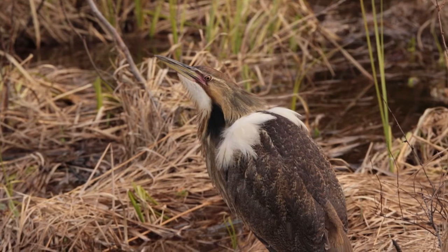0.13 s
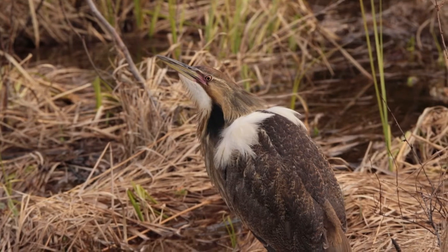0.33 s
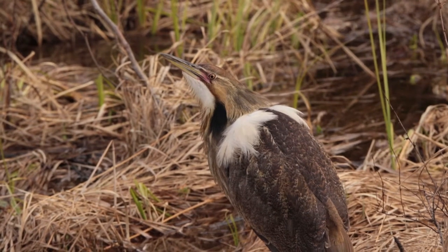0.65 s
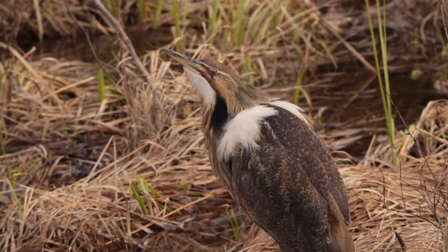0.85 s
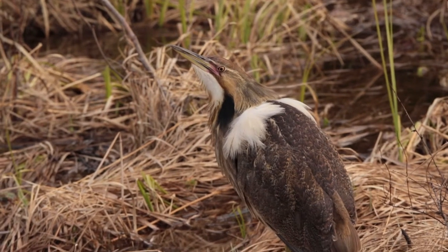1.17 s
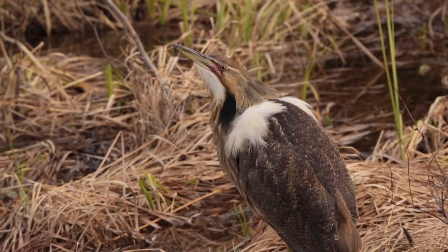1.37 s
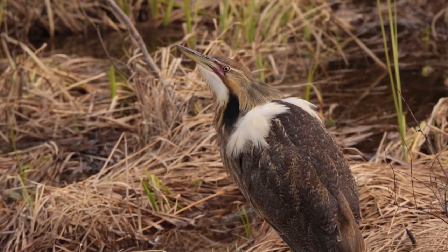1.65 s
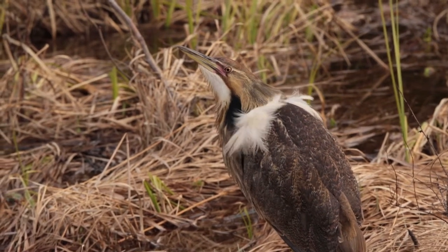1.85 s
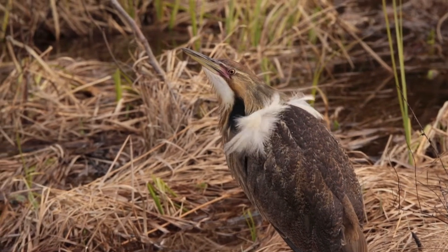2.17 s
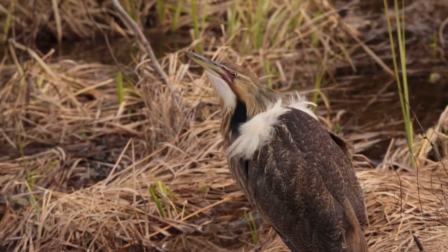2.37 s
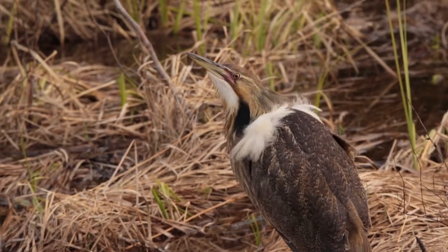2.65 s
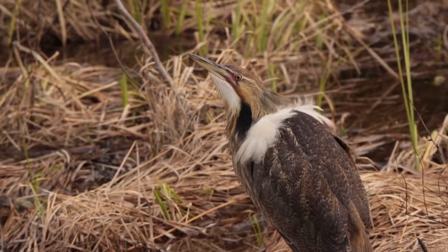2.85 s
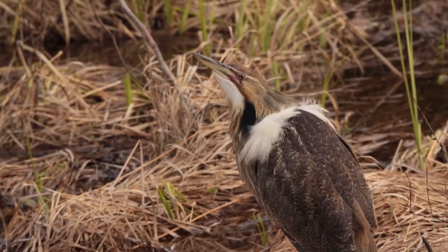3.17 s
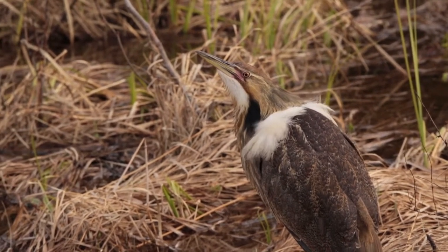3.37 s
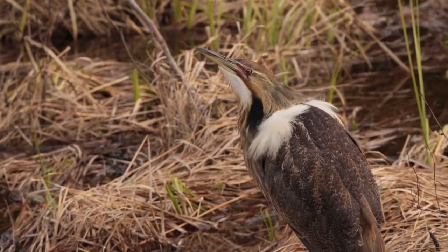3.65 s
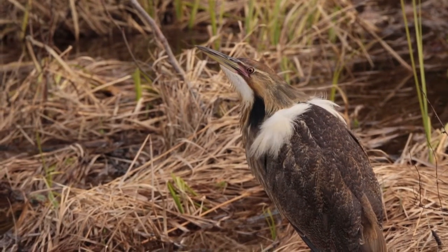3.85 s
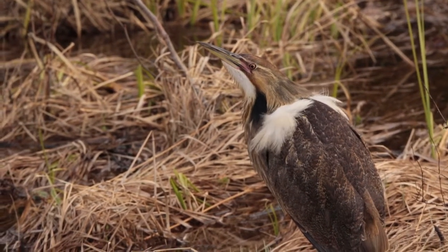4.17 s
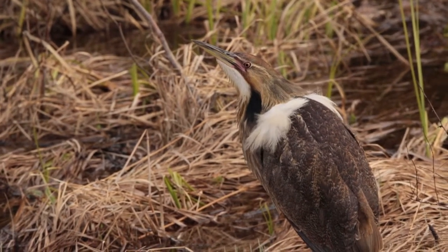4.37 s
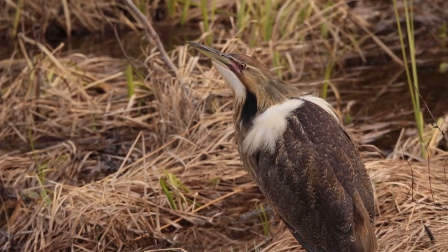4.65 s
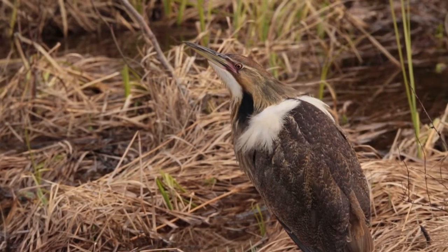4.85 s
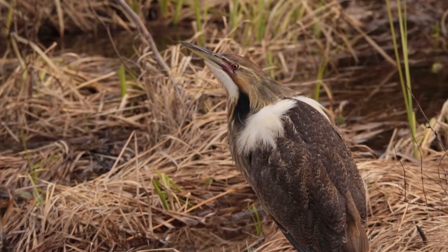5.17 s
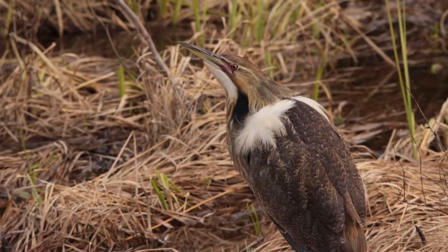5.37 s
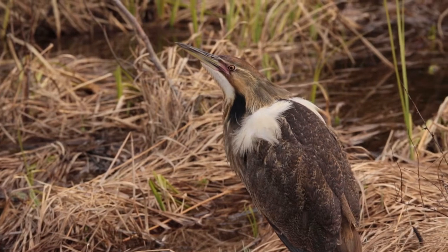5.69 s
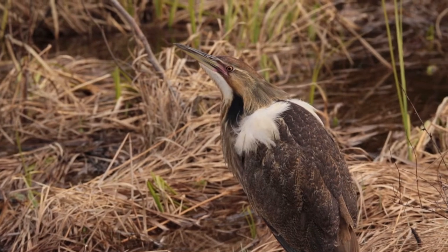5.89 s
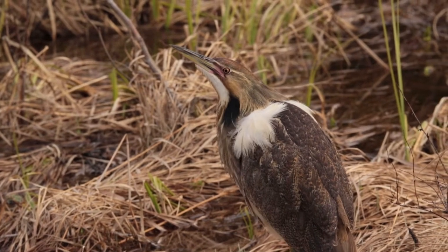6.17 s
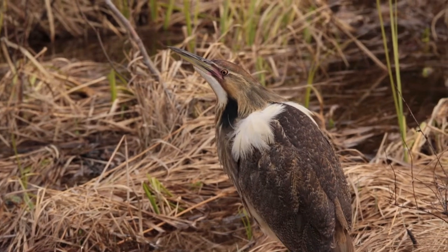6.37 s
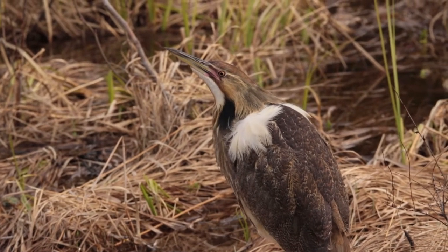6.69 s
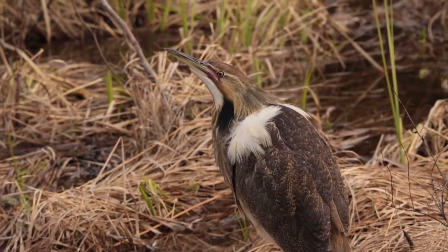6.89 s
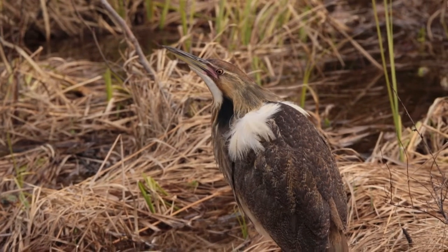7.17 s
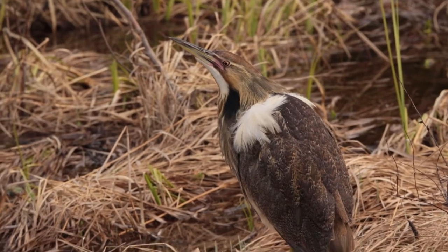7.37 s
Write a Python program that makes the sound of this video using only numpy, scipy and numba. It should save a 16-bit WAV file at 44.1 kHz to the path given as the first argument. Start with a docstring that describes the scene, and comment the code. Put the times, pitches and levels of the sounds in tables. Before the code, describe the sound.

Outdoor marsh: low wind buffeting at the start, steady far frog chorus, six sharp close frog peeps, faint hum and two light knocks.

```python
"""First one hears a gust of wind rumble on a microphone: noise through low-pass filters that follow the wind.
Behind it far tree frogs merge into a high chorus of overlapping sine glides, over faint distant air.
Soon one close frog peeps about once a second: multiples of a gliding fold rate, weighted by its vocal sac.
Later the tripod mount hums low and is knocked twice, as two damped modes driven by noise and by impulses.
One microphone feeds both channels; each adds its own amplifier hiss, a separate shaped noise."""
import sys
import numpy as np
from scipy import signal
from scipy.fft import rfft, irfft
from scipy.io import wavfile
from scipy.ndimage import uniform_filter1d
from numba import njit

SR = 44100
rng = np.random.default_rng(int(sys.argv[2]) if len(sys.argv) > 2 else 0)


def nominal_scale(level):
    """Amplitude ratio for a level in decibels (scalar or array-like)."""
    x = np.asarray(level, float) / 20
    return 10 ** x


def inscribe(sig):
    """Save sig as 16-bit PCM at rate SR to the path in sys.argv[1].

    A 1-D sig is mono; a 2-D sig holds one channel per row.
    Samples are clipped to [-1, 1] before scaling.
    """
    pcm = np.round(np.clip(np.atleast_2d(sig).T, -1, 1) * 32767)
    wavfile.write(sys.argv[1], SR, pcm.astype(np.int16))


N = 332236  # samples
T = np.arange(N) / SR  # s


def level(x, db):
    """Root-mean-square scaling: sets the rms of the whole signal."""
    return x * nominal_scale(db) / np.sqrt(np.mean(x ** 2))


def curve(rows, calm_db):
    """Linear interpolation of a (t/s, level/dB) table, calm outside it."""
    t, db = np.transpose(rows)
    return np.interp(T, t, db, calm_db, calm_db)


def colour(points, hz):
    """Spectral envelope: level in dB, interpolated along log frequency."""
    f, db = np.transpose(points)
    return np.interp(np.log(np.maximum(hz, 1)), np.log(f), db)


def noise(points, channels):
    """Spectral shaping: white noise weighted by an envelope in the frequency domain."""
    white = rfft(rng.standard_normal((channels, N)))
    hz = np.arange(N // 2 + 1) * SR / N
    return irfft(white * nominal_scale(colour(points, hz)), N)


def walk(rate, size=N):
    """Slow random modulation: levels held 1 / rate s, smoothed twice, standard deviation 1."""
    hold = max(int(SR / rate), 1)
    steps = np.repeat(rng.standard_normal(size // hold + 2), hold)
    smooth = uniform_filter1d(uniform_filter1d(steps, hold), hold)[:size]
    return smooth / smooth.std()


@njit
def low_pass(x, hz, damp):
    """State-variable filter: a resonator's low-pass output, its corner moving every sample."""
    y, band, low = np.empty(len(x)), 0., 0.
    for i in range(len(x)):
        g = np.tan(np.pi * hz[i] / SR)
        v = (band + g * (x[i] - low)) / (1 + g * (g + damp))
        y[i] = low + g * v
        band, low = 2 * v - band, 2 * y[i] - low
    return y


# wind on the microphone before puffs and flurries, one table a gust: (t/s, level/dB)
GUSTS = [
    [(0, -48), (.24, -47.5), (.42, -39.5), (.8, -42.5), (1.6, -43.5), (1.72, -47), (2.05, -43.5),
     (2.26, -51), (2.56, -50.5), (2.83, -60), (3.1, -76)],
    [(3.69, -81), (3.72, -66), (3.82, -69), (3.99, -69), (4.08, -74), (4.2, -69), (4.23, -81)],
    [(5.24, -74), (5.29, -65.5), (5.45, -71), (5.65, -62), (6.04, -58), (6.33, -50), (6.45, -49.5),
     (6.63, -52), (6.8, -48.5), (7.1, -52.5), (7.33, -58.5), (7.53, -55.5)],
]
# brief puffs (+) and lulls (-) inside the gusts: (t/s, level change/dB)
PUFFS = [(0.411, 3.5), (.53, 4.5), (0.871, 6), (1.07, 4), (1.16, 3.5), (1.37, 4.5), (1.5, 3), (1.61, 8),
         (1.84, 3.5), (2.05, 1.5), (2.31, 3.5), (5.6, 6), (6.33, 0), (6.89, -11), (7.03, 3.5), (7.17, 4)]
CALM_DB = -86  # between gusts
PUFF_S, FLURRY_DB = 0.023, 0.85  # half width of a puff; quick random flicker of the wind
# eddy corner at -42 dB; its rise in dB of frequency (20 log10) per dB of wind; microphone low cut
EDDY_HZ, EDDY_SLOPE, LOW_CUT_HZ = 126.5, 0.22, 57.4


def wind():
    """Turbulence: eddies tumble past the capsule; a faster gust is louder and its eddies reach higher."""
    db = np.max([curve(rows, CALM_DB) for rows in GUSTS], axis=0)
    db = uniform_filter1d(db, size=SR // 60)
    pace_db = uniform_filter1d(db, size=SR // 6) + 42
    corner_hz = EDDY_HZ * nominal_scale(EDDY_SLOPE * pace_db + 0.82 * walk(14))
    eddies = low_pass(rng.standard_normal(N), corner_hz, 0.94)
    rumble = low_pass(eddies, 1.93 * corner_hz, 2.4)
    low_cut = signal.butter(2, LOW_CUT_HZ, "high", fs=SR, output="sos")
    rumble = signal.sosfilt(low_cut, rumble)
    # even out the running power, so that the level comes from the tables
    steady = rumble / np.sqrt(uniform_filter1d(rumble ** 2, size=SR // 8) + 1e-12)
    puffs_db = sum(change_db * np.exp(-((T - t) / PUFF_S) ** 2) for t, change_db in PUFFS)
    return steady * nominal_scale(db + puffs_db + FLURRY_DB * walk(14))


FAR_COUNT, FAR_S = 2218, .13  # peeps over the scene and the half second before it; length of each
FAR_HZ, FAR_SPREAD_HZ, FAR_SCATTER_DB = 2686, 125, 2  # mean pitch; standard deviations of pitch and level
FAR_RISE = 0.1298  # rise within a peep, as a share of its pitch
MARSH_T60_S, MARSH_WET_DB = 1, 2.5  # decay time; reverberant energy over direct
CHORUS_DB, CHORUS_SWELL_DB = -67, 0.73  # level before the swell; spread of the slow swell


def far_frogs():
    """Superposition and reverberation: hundreds of rising peeps a second overlap, and the marsh smears them."""
    chance = rng.standard_normal((FAR_COUNT, 2))
    starts = (rng.random(FAR_COUNT) * (N + SR // 2)).astype(int)
    size = int(FAR_S * SR)
    u = np.arange(size) / size
    glide = np.cumsum(1 + FAR_RISE * (np.sin(np.pi * .58 * u) - .65))
    envelope = np.sin(np.pi * u)
    direct = np.zeros(N + SR)
    for i, (pitch, loudness) in zip(starts, chance):
        hz = FAR_HZ + FAR_SPREAD_HZ * pitch
        tone = np.sin(2 * np.pi * hz * glide / SR)
        direct[i:i + size] += nominal_scale(FAR_SCATTER_DB * loudness) * tone * envelope
    t = np.arange(SR // 2) / SR
    decay = rng.standard_normal(len(t)) * 1000 ** (-t / MARSH_T60_S)
    tail = level(decay, MARSH_WET_DB) / np.sqrt(len(t))
    chorus = direct + signal.fftconvolve(direct, tail)[:len(direct)]
    chorus = level(chorus[SR // 2:SR // 2 + N], 0)
    return chorus * nominal_scale(CHORUS_DB + CHORUS_SWELL_DB * walk(2.99))


# spectrum of the distant air: (f/Hz, relative level/dB per Hz)
AIR_SPECTRUM = [(20, -4.5), (60, 2.5), (140, -1), (220, -3), (500, -5.5), (900, -9.5), (1800, -24),
                (4000, -30)]


def distant_air():
    """Stationary broadband noise: one shaped noise at the capsule, alike in both channels."""
    return level(noise(AIR_SPECTRUM, channels=1)[0], -73.5)


# spectrum of the amplifier hiss: (f/Hz, relative level/dB per Hz)
HISS_SPECTRUM = [(20, -1.5), (300, -1.5), (2000, -4.5), (4000, -6.5), (13000, -8.5), (16000, -8)]


def amplifier_hiss():
    """Uncorrelated noise: each channel's amplifier hisses independently of the other."""
    return level(noise(HISS_SPECTRUM, channels=2), -65)


# effort swells twice while held: (share of the held time, level relative to the peep's effort/dB)
EFFORT = [(.2, 0), (.45, -3), (.7, 1), (.88, -3.5), (1, -8.5)]
START_DB, OPENING_DB = -2.5, -2  # relative to the peep's effort, before and after the scoop
TAIL_DB, TAIL_FADE_DB = -60.5, -5  # effort once slack, and its change by the end
# end of a scoop of no length; a longer scoop starts lower and lands higher
OPENING_HZ, SCOOP_HZ_PER_S, OVERSHOOT_HZ_PER_S = 1201, 12100, 7000
TOP_FROM, TOP_TO, HOOK_HZ = .72, .9, 52  # shares of the held time at the top rate, then a droop
COLLAPSE_S, COLLAPSED_HZ = .011, 1045
LINGER_S, LINGER_HZ_PER_S, TAIL_S, SAG_HZ_PER_S = .02, 2500, .024, 8500  # both rates fall


def peep(scoop, held, top_hz, db):
    """Fold tension sets the rate: scoop, climb, top, droop, collapse; slack, it lingers and sags away."""
    slack_s = held + COLLAPSE_S
    linger_end_s = slack_s + LINGER_S
    end_s = linger_end_s + TAIL_S
    t = np.arange(int(end_s * SR)) / SR
    opening_hz = OPENING_HZ + OVERSHOOT_HZ_PER_S * scoop
    start_hz = opening_hz - SCOOP_HZ_PER_S * scoop
    sag_hz = COLLAPSED_HZ - LINGER_HZ_PER_S * LINGER_S
    end_hz = sag_hz - SAG_HZ_PER_S * TAIL_S
    hz = np.interp(t, [0, scoop, TOP_FROM * held, TOP_TO * held, held, slack_s, linger_end_s, end_s],
                   [start_hz, opening_hz, top_hz, top_hz, top_hz - HOOK_HZ, COLLAPSED_HZ, sag_hz, end_hz])
    share, relative_db = np.transpose(EFFORT)
    effort_db = np.interp(t, [0, scoop, *(share * held), slack_s, end_s],
                          [db + START_DB, db + OPENING_DB, *(db + relative_db),
                           TAIL_DB, TAIL_DB + TAIL_FADE_DB])
    return hz, effort_db


# the close frog's peeps: (start t/s, scoop t/s, held t/s, top fold rate f/Hz, effort level/dB)
PEEPS = [(.977, .007, 0.11, 1388, -53), (2.499, 0.013, .119, 1413, -52), (3.765, 0.0064, 0.13, 1423, -53),
         (4.93, 0.0048, .130, 1430, -52), (5.978, 0.0042, .131, 1425, -55.5),
         (6.979, 0.0053, .122, 1447, -54.5)]
# what the frog's vocal sac radiates: (f/Hz, level/dB)
SAC = [(800, -34), (1250, -22), (1450, -17), (1700, -18), (2000, -8), (2450, 0), (3150, 0), (3550, -9),
       (3900, -20), (4300, -36)]
# fold pulse strength; slack folds slap shut and sound richer:
# (multiple of the rate, level when tight/dB, level when slack/dB)
OVERTONES = [(1, 0, -6), (2, 0, -2), (3, -22, -2), (4, -34, -5), (5, -40, -7)]
UNDERTONE_DB = -7  # how much of the first multiple leaks past the sac
SLACK_HZ, SLACK_JITTER, TIGHT_JITTER = 1250, .02, .003  # jitters are shares of the rate


def close_frog():
    """Source and filter: multiples of the fold rate, each as loud as the vocal sac lets it."""
    out, jitter, flutter = np.zeros(N), walk(250), walk(220)
    for start, scoop, held, top_hz, db in PEEPS:
        hz, effort_db = peep(scoop, held, top_hz, db)
        i = int(start * SR) + np.arange(len(hz))
        rate = uniform_filter1d(hz, size=100)
        # under SLACK_HZ the folds go slack and beat unevenly
        slack = np.clip((SLACK_HZ - rate) / 150, 0, 1)
        rate = rate * (1 + (TIGHT_JITTER + SLACK_JITTER * slack) * jitter[i])
        phase = 2 * np.pi * np.cumsum(rate) / SR
        tone = 0
        for k, tight_db, slack_db in OVERTONES:
            fold_db = tight_db + (slack_db - tight_db) * slack
            sac_db = colour(SAC, k * rate) + UNDERTONE_DB * (k == 1)
            tone = tone + nominal_scale(fold_db + sac_db) * np.sin(k * phase)
        flutter_db = (.8 + 3 * slack) * flutter[i]
        edge = np.minimum(np.minimum(i - i[0], i[-1] - i) / (.002 * SR), 1)  # 2 ms fades
        out[i] = np.sqrt(2) * tone * nominal_scale(effort_db + flutter_db) * edge
    return out


# modes of the mount: (f/Hz, level/dB, 60 dB decay t/s)
MODES = [(300.3, 1, 0.076), (689, -7.5, 0.034)]


def mount_modes(blow):
    """Modal resonance: each mode answers a blow with a decaying sine."""
    out = 0
    for hz, db, t60 in MODES:
        pole = np.exp(2j * np.pi * hz / SR - np.log(1000) / (t60 * SR))
        out = out + nominal_scale(db) * signal.lfilter([1], [1, -pole], blow).imag
    return out


# spells in which the mount hums: (start t/s, length t/s, level/dB)
SPELLS = [(3.08, 0.6, -78), (3.704, 0.17, -71.5), (4.313, 0.8, -76), (5.45, 0.67, -72.5),
          (6.75, 0.42, -74.5), (7.392, .07, -72.5)]
# light knocks on the mount: (t/s, blow level/dB)
KNOCKS = [(3.722, -63), (7.411, -58)]
RING_FADE_DB_PER_S, RING_REST_DB = 150, -86  # slope into and out of a spell; level between spells


def mount():
    """Forced and free vibration: small shakes keep the mount humming in spells; two knocks ring it clearly."""
    blows = np.zeros(N)
    for t, db in KNOCKS:
        blows[int(t * SR)] = nominal_scale(db)
    shakes = rng.standard_normal(N) * nominal_scale(1.7 * walk(8))
    hum = level(mount_modes(shakes), 0)
    spells_db = []
    for start, length, db in SPELLS:
        outside_s = np.maximum(np.maximum(start - T, T - start - length), 0)
        spells_db.append(db - RING_FADE_DB_PER_S * outside_s)
    hum_db = np.maximum(np.max(spells_db, axis=0), RING_REST_DB)
    return hum * nominal_scale(hum_db) + mount_modes(blows)


def scene():
    """Linear superposition: all pressures add at the single capsule, which feeds both channels."""
    capsule = wind() + far_frogs() + distant_air() + close_frog() + mount()
    return np.tile(capsule, (2, 1))


def top_cut(x):
    """Nothing passes above the cut-off."""
    return signal.sosfilt(signal.butter(12, 15870, fs=SR, output="sos"), x)


def record(dry):
    """Additive noise: each channel's amplifier adds its own hiss."""
    mix = dry + amplifier_hiss()
    return top_cut(mix)


dry = scene()
out = record(dry)
inscribe(out)
```